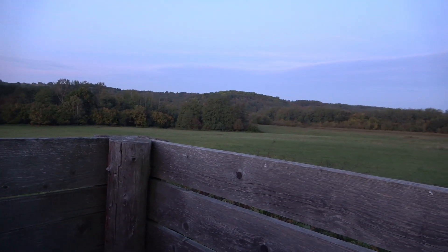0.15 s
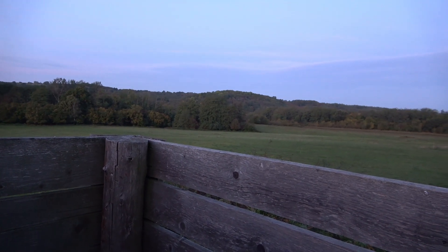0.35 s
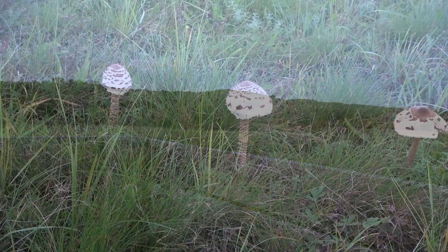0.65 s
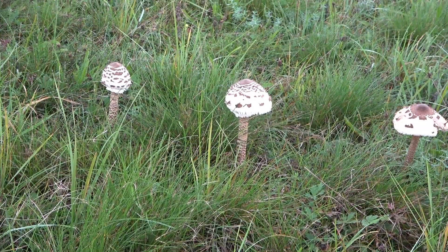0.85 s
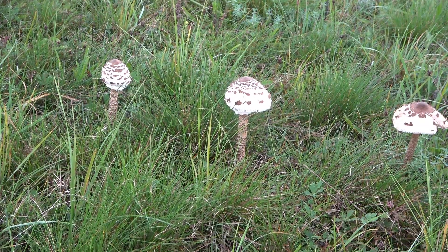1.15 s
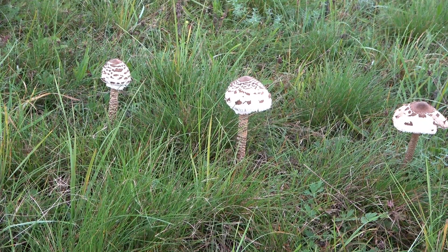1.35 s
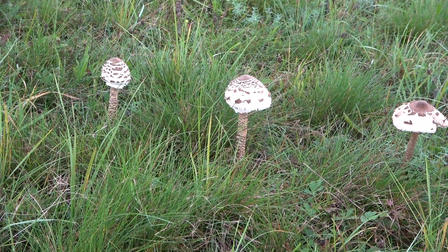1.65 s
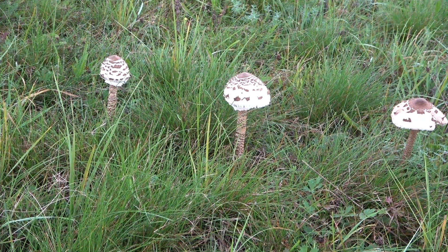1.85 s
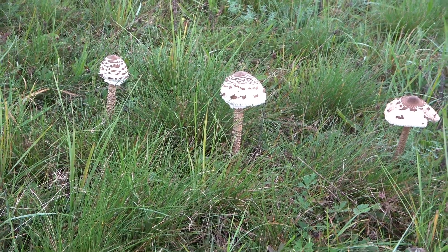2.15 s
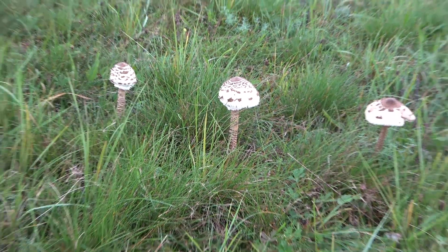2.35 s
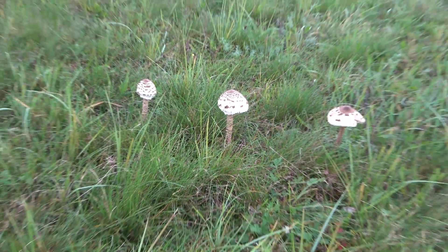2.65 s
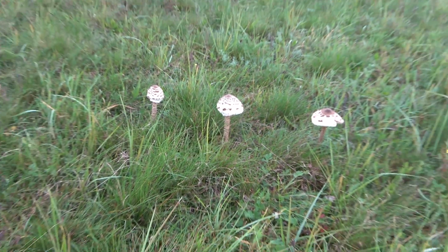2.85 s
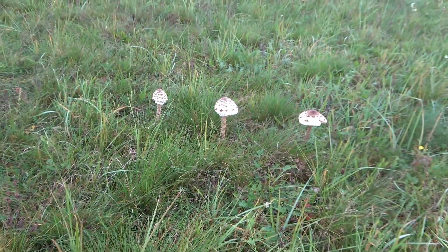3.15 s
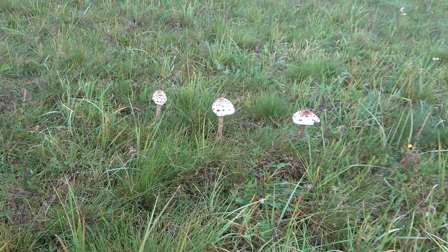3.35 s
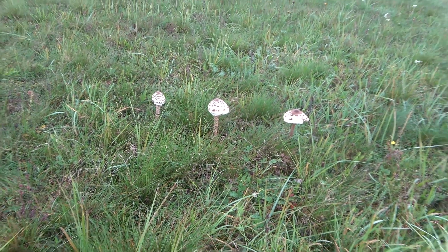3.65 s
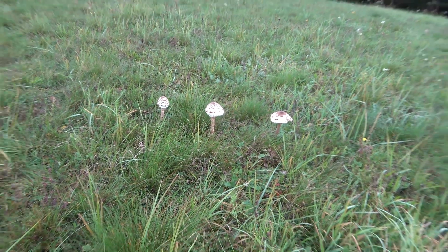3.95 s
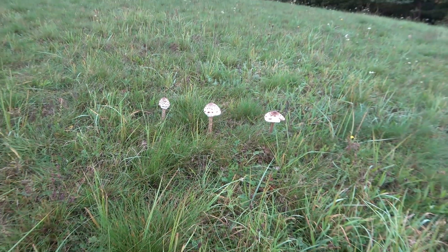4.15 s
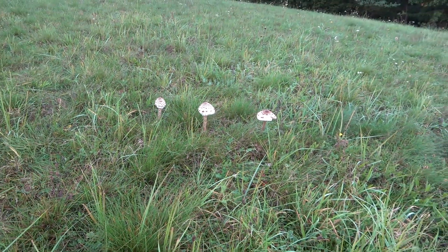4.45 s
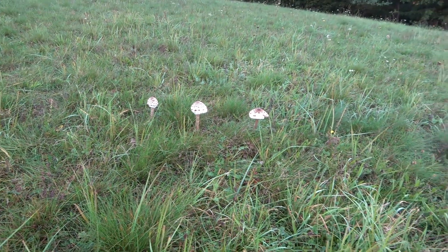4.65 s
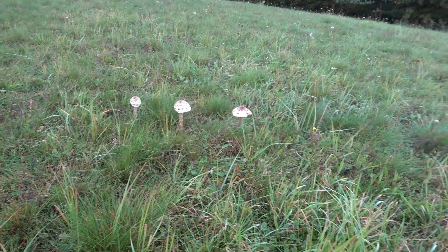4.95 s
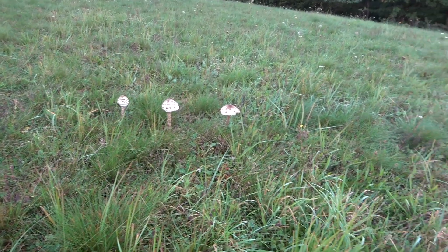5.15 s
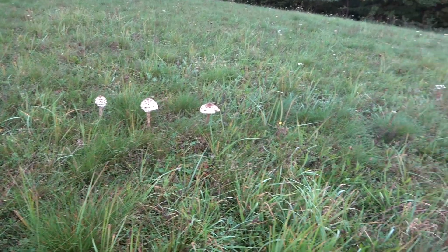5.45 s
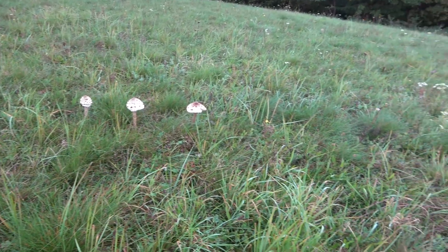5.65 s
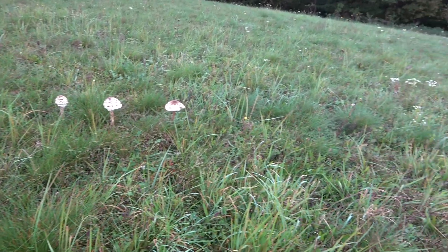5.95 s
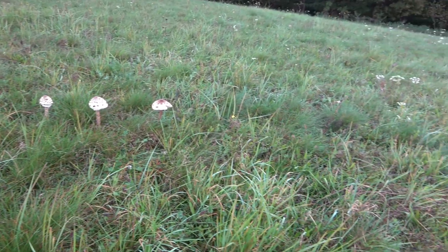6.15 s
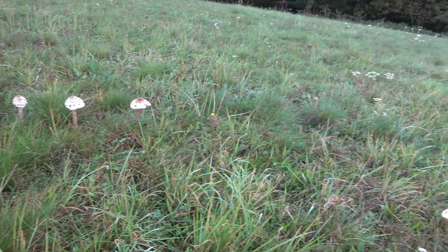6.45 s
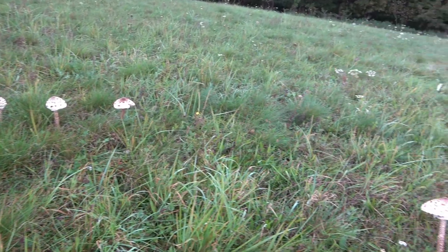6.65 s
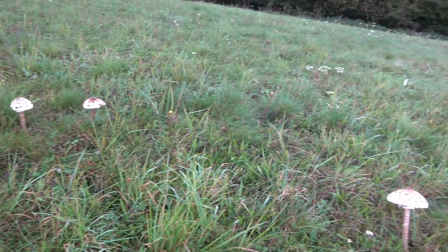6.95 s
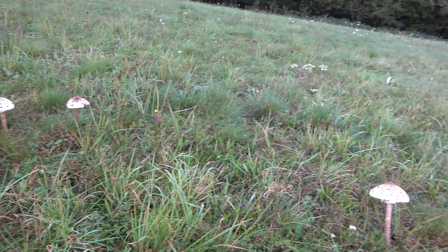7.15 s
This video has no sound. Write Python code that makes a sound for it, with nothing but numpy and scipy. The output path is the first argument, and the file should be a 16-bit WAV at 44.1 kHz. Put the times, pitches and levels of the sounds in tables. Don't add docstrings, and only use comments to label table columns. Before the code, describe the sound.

Across a quiet meadow, a buck belches out a run of croaking groans, uneven in length and strength, the third faint and the sixth brief. Early ones are cleaner knocks, later ones hoarser and thinner. Breathy rasp and scattered woodland echo trail each call. The field microphone hears the right side clearer and earlier, with the left duller, over insect fizz and soft rumble.

```python
import sys
import numpy as np
from scipy import signal
from scipy.fft import rfft, irfft, next_fast_len
from scipy.io import wavfile
from scipy.ndimage import uniform_filter1d

SR = 44100
rng = np.random.default_rng(int(sys.argv[2]) if len(sys.argv) > 2 else 0)


def volts_from_db(level):
    exponent = np.asarray(level, float) / 20
    return 10 ** exponent


def put_to_file(sound):
    columns = np.atleast_2d(sound).T
    safe = np.clip(columns, -1, 1)
    whole_steps = np.round(safe * 32767)
    wavfile.write(sys.argv[1], SR, whole_steps.astype(np.int16))


N = 321930
LEAD_SAMPLES = 40

# time_s, peak_db, lips_over_peak_db, palate_over_peak_db
ACCENTS = [(0.3604, -33.5, -9.5, -43), (0.6602, -19.5, -8, -34), (1.2317, -37.5, -5.5, -21),
           (1.2779, -26, -12, -37), (1.3254, -28.5, -0.5, -26.5), (1.3724, -29, -11.5, -17),
           (1.4076, -23.5, -10.5, -26), (1.5358, -24.5, -16, -24), (2.2255, -40, -11.5, -47),
           (2.3239, -29.5, -15.5, -28.5), (2.4509, -26.5, -10, -35), (2.4956, -27, -6, -34),
           (3.0824, -34, -12, -18), (3.1355, -32, -20, -29), (3.1799, -24, -10.5, -31),
           (3.3444, -21.5, -14, -32.5), (3.3813, -21.5, -18, -19), (4.3707, -46.5, -3, -17),
           (4.4219, -32.5, -2.5, -29), (4.5038, -22, -13, -31), (4.6453, -30, -3, -16),
           (4.686, -32, -4.5, -24), (4.7247, -28.5, -11.5, -38), (5.7389, -30.5, -11, -16),
           (5.7933, -17.5, -15.5, -26), (5.8282, -18.5, -15.5, -22), (6.4211, -20.5, -8.5, -35),
           (6.5132, -19, -18, -28), (6.999, -35, -11.5, -28), (7.228, -19.5, -12, -26.5)]
# start_s, crest_s, end_s, gullet_db, lower_throat_db
BODY = [(-.3, -0.234, 0.017, -43, -72), (0.374, 0.445, 0.75, -33, -46.5), (1.252, 1.397, 1.565, -33, -51.5),
        (2.242, 2.425, 2.52, -30.5, -47), (3.146, 3.218, 3.555, -31.5, -47), (4.186, 4.325, 4.39, -33, -60),
        (4.416, 4.58, 4.713, -32, -59), (5.085, 5.126, 5.356, -32.5, -54), (5.704, 5.733, 6.11, -35, -50),
        (6.32, 6.475, 6.68, -34, -47.5), (7.012, 7.06, 7.39, -31.5, -47.5)]
# open_s, widest_s, closed_s, mouth_db, throat_db
MOUTH = [
    (-.3, -.2, 0.017, -37.5, -49.5),
    (0.382, 0.578, 0.77, -27, -48.5),
    (1.216, 1.473, 1.607, -30.5, -50),
    (2.18, 2.4, 2.63, -38.5, -52.5),
    (3.076, 3.367, 3.55, -30, -48.5),
    (4.427, 4.564, 4.795, -33.5, -53),
    (5.095, 5.239, 5.35, -31.5, -53.5),
    (5.73, 5.817, 6.052, -32.5, -49.5),
    (6.36, 6.483, 6.681, -28.5, -47.5),
    (7.006, 7.219, 7.48, -29, -46.5),
]


def unit(x):
    return x / np.sqrt(np.mean(x ** 2) + 1e-20)


def unit_power(h):
    return h / np.sqrt(np.mean(np.abs(h) ** 2))


def along(points, hz):
    f, v = np.transpose(points)
    return np.interp(np.log(hz + 1), np.log(f + 1), v)


def filtered(x, response):
    m = next_fast_len(N + SR // 2)
    spectrum = rfft(x, m) * response(np.fft.rfftfreq(m, 1 / SR))
    return irfft(spectrum, m)[..., :N]


def swell(rows, level_db, build_db, sag_db, attack_db_s, release_db_s):
    t, power = np.arange(0, N + 64, 64) / SR, 1e-12
    for (start, crest, end), db in zip(np.asarray(rows)[:, :3], level_db):
        shape = np.interp(t, [start, crest, end], [-build_db, 0, -sag_db])
        shape -= attack_db_s * np.clip(start - t, 0, None)
        shape -= release_db_s * np.clip(t - end, 0, None)
        power = power + volts_from_db(db + shape) ** 2
    return np.interp(np.arange(N) / SR, t, 10 * np.log10(power))


def power_sum_db(a_db, b_db):
    return 10 * np.log10(volts_from_db(a_db) ** 2 + volts_from_db(b_db) ** 2)


def effort():
    # start_s, crest_s, end_s, level_db
    grunts = [(-.1, 0, 0.039, -40), (0.16, 0.252, 0.54, -49), (0.316, 0.425, 0.85, -36.5),
              (0.794, 0.854, 0.96, -42.5), (1.22, 1.423, 1.57, -35.5), (1.68, 1.71, 1.537, -23.5),
              (1.95, 2.054, 2.04, -46), (2.25, 2.45, 2.644, -33), (2.743, 2.86, 3, -42),
              (3.112, 3.294, 3.61, -35.5), (3.744, 3.793, 6.8, -50), (4.082, 4.17, 4.17, -32),
              (4.456, 4.542, 4.6, -33.5), (4.766, 4.82, 4.77, -30.5), (5.07, 5.267, 5.4, -35),
              (5.497, 5.564, 5.54, -34), (5.745, 5.914, 6.1, -28.5), (6.34, 6.5, 6.76, -33),
              (7.02, 7.13, 7.25, -31.5)]
    body, mouth, grunts = np.array(BODY), np.array(MOUTH), np.array(grunts)
    gullet = swell(body, body[:, 3], 5.8, 8.6, 141, 160)
    chest = swell(grunts, grunts[:, 3], 4.5, 7.9, 147, 98)
    lower = swell(body, body[:, 4], 4.7, 10.6, 240, 53)
    later_s = [0.041, 0.056, 0.052, 0, 0]
    upper = swell(mouth + later_s, mouth[:, 4], 3.9, 10.5, 240, 67)
    opening = swell(mouth, mouth[:, 3], 12.7, 13.4, 390, 116)
    upper = power_sum_db(upper, gullet - 26)
    opening = power_sum_db(opening, gullet - 19)
    return chest, power_sum_db(gullet, -61), lower, upper, opening


def folds(mouth_db):
    # time_s, snap_rate_hz
    snap_rates = [
        [(0.318, 18.5), (0.382, 29.2), (0.675, 31.8), (0.82, 18.4)],
        [(1.182, 19.6), (1.343, 22.3), (1.449, 33.7), (1.63, 18.7)],
        [(2.067, 19.9), (2.17, 18.0), (2.437, 24.8), (2.605, 16.0)],
        [(3.032, 20.5), (3.101, 17.8), (3.301, 34.2), (3.645, 15.4)],
        [(4.046, 17.8), (4.379, 18.9), (4.534, 30.0), (4.875, 18.0)],
        [(5.042, 26.1), (5.265, 27.3), (5.307, 36.4), (5.405, 21.4)],
        [(5.683, 37.5), (5.946, 28.2), (5.973, 20.3), (6.145, 24.2)],
        [(6.305, 20.2), (6.534, 38.2), (6.673, 20.3), (6.736, 22.1)],
        [(6.962, 22.1), (7.156, 36.9), (7.194, 30.0), (7.295, 32.8)],
    ]
    crest_db, follow = 9, 0.76
    train, voiced, age_s, which = np.zeros(N), np.zeros(N), np.zeros(N), np.zeros(N, int)
    for k, rows in enumerate(snap_rates):
        s, rate_hz = np.transpose(rows)
        at = np.arange(round(s[0] * SR), min(N, round(s[-1] * SR)))
        now_hz = np.interp(at / SR, s, rate_hz)
        snap = np.diff(np.floor(np.cumsum(now_hz) / SR), prepend=-1) > 0
        train[at[snap] - 70] = np.sqrt(SR / now_hz[snap])
        voiced[at[0]:at[-1] + SR // 30] = 1
        which[at[0] - SR // 10:] = k
        age_s[at[0]:] = np.arange(N - at[0]) / SR
    snaps = np.flatnonzero(train)
    accent_db, bright_db, sharp_db = np.zeros(N), np.zeros(N), np.zeros(N)
    usual = np.mean(ACCENTS, axis=0)
    for s, db, lips_db, palate_db in ACCENTS:
        old = snaps[np.argmin(abs(snaps - s * SR))]
        size, train[old] = train[old], 0
        at = round(s * SR) - LEAD_SAMPLES
        train[at] = size
        accent_db[at] = np.clip(db - mouth_db[at] - crest_db, -8, 10)
        bright_db[at - 9:at + SR // 40] = follow * (lips_db - usual[2])
        sharp_db[at - 9:at + SR // 40] = follow * (palate_db - usual[3])
    return train, uniform_filter1d(voiced, SR // 50), age_s, which, accent_db, bright_db, sharp_db


def excite(train, rasp, click, puff_s, scatter_db):
    t = np.arange(SR // 20) / SR
    puff = np.exp(-t / puff_s) * (1 - np.exp(-t / 0.00057))
    chance = np.clip(rng.standard_normal(N), -2.2, 1.2)
    accented = np.round(np.array(ACCENTS)[:, 0] * SR).astype(int) - LEAD_SAMPLES
    chance[accented] = 0
    train = train * volts_from_db(scatter_db * chance)
    puffs = signal.fftconvolve(train, puff / np.linalg.norm(puff))[:N] * rng.standard_normal(N)
    click, rasp = np.clip(click, 0, 1), np.clip(rasp, 0, 1)
    snaps = np.sqrt(click) * train + np.sqrt(1 - click) * puffs
    return np.sqrt(1 - rasp) * snaps + np.sqrt(rasp) * rng.standard_normal(N)


def tract(x, modes, lo_hz, hi_hz):
    def response(f):
        ring = 0
        for k, (c, w, db) in enumerate(modes):
            ring = ring + (-1) ** k * volts_from_db(db) * 1j * f * w / (c * c - f * f + 1j * f * w)
        edge = signal.butter(4, [lo_hz, hi_hz], "band", fs=SR, output="sos")
        return unit_power(ring * signal.sosfreqz(edge, f, fs=SR)[1])
    return filtered(x, response)


def buck():
    # centre_hz, width_hz, level_db
    chest_modes = [(136.4, 30.3, -3), (157.3, 25, -4)]
    belly_modes = [(97.6, 53, -22), (123.5, 10.7, -6.5)]
    gullet_modes = [(182, 62, -6.5), (222, 19.6, 2.5), (240.4, 10.5, -17)]
    throat_modes = [(308, 28, -4.5), (359.4, 13.6, 2.5), (522, 53, -4.5), (608.2, 6.6, 2.5),
                    (838, 37, -10.5), (1020, 15.9, 4.5), (1069, 78, -3), (1275, 35, -4), (1510, 510, -16.5)]
    tongue_modes = [(1725, 60, -1.2), (1835, 86, -2.3), (1928, 39, 0.91)]
    jaw_modes = [(2053, 50, 15.5), (2231, 43, 15), (2375, 135, 2)]
    lips_modes = [(2545, 168, -5), (2793, 83, 1.5), (3010, 154, -1.5), (3047, 486, -7.5)]
    palate_modes = [(3885, 41, 3), (4270, 150, -8), (4770, 184, 0), (5880, 340, -16), (7260, 700, -18.5)]
    # hoarseness_0_to_1, belly_db, tongue_db, lips_db, palate_db
    characters = [
        (0.48, -3.5, -1.5, -1, 3),
        (0.34, 1.5, -1.5, -0.5, 2),
        (0.22, -4, 0.5, 2, 7.5),
        (0.19, 0.5, -3.5, -0.5, 2),
        (0.4, 1, 0, -0.5, 8),
        (0.59, 1.5, 3, -0.5, 8.5),
        (0.78, -11.5, 3.5, -0.5, 3.5),
        (0.64, -6, 2.5, -0.5, 4),
        (0.59, -7.5, 2, 0.5, 3.5),
    ]
    chest_db, gullet_db, lower_db, throat_db, mouth_db = effort()
    train, voiced, age_s, which, accent_db, bright_db, sharp_db = folds(mouth_db)
    hoarse, belly_db, tongue_db, lips_db, palate_db = np.transpose(characters)[:, which]

    hoarse = hoarse * np.clip(age_s / 0.096, 0, 1) ** 2
    shut_s = np.arange(N) / SR - np.array(MOUTH)[1:, 2][which]
    hoarse = hoarse + 0.34 * np.clip(shut_s / 0.027, 0, 1)
    closing_db = 8 * np.clip(age_s, 0, .6)
    rasp = 1 - voiced * (1 - hoarse)

    early = np.roll(train * volts_from_db(0.4 * accent_db), -130)
    train = train * volts_from_db(accent_db)

    push = excite(early, rasp + 0.11, 0.74, 0.0098, scatter_db=-1.6)
    chest = tract(volts_from_db(chest_db - 3.0) * push, chest_modes, 116.7, 203.7)
    chest = chest + tract(volts_from_db(chest_db + belly_db - 5.0) * push, belly_modes, 64.3, 134.6)

    pump = volts_from_db(gullet_db) * excite(early, 0.48 * rasp + 0.5 * (1 - voiced), 0.93, 0.0052, scatter_db=1.14)
    tight_db = 4 * (np.clip(age_s / 0.24, 0, 1) - .5)
    gullet = tract(volts_from_db(-8 - tight_db) * pump, gullet_modes[:1], 94, 271)
    gullet = gullet - tract(volts_from_db(-2.0 + 0.36 * tight_db) * pump, gullet_modes[1:], 143, 297)

    air = excite(train, rasp + 0.52, 0.1, 0.018, scatter_db=4.0)
    throat = tract(volts_from_db(throat_db + 8.0) * air, throat_modes[4:], 644, 1580)
    air = excite(train, rasp + 0.34, 0.19, 0.008, scatter_db=4.5)
    throat = throat + tract(volts_from_db(lower_db + 4) * air, throat_modes[:4], 312, 630)

    air = excite(train, rasp, 0.39, 0.0066, scatter_db=4.0)
    level_db = mouth_db + tongue_db - 2 - 0.55 * bright_db + 22 * np.clip(shut_s, 0, .15)
    tongue = tract(volts_from_db(level_db) * air, tongue_modes, 1663, 2130)

    air = excite(train, rasp, 0.61, 0.013, scatter_db=2.5)
    jaw = tract(volts_from_db(mouth_db - 2.63 - 0.15 * closing_db) * air, jaw_modes, 1940, 2820)

    air = excite(train, rasp, 0.42, 0.0055, scatter_db=2.5)
    lips = tract(volts_from_db(mouth_db + lips_db - 3 - closing_db + bright_db) * air, lips_modes, 2230, 3650)

    air = excite(train, 0.55 * rasp, 0.05, 0.004, scatter_db=5.0)
    palate = tract(volts_from_db(mouth_db + palate_db - 22 - closing_db + sharp_db) * air, palate_modes, 2970, 7100)
    return chest + gullet + throat + tongue + jaw + lips + palate


def trees(x, count=40):
    # freq_hz, t60_s
    decay = [(100, 0.41), (1000, 0.27), (2500, 0.39), (6000, 0.38)]
    delay = 250
    out, hop = np.zeros((2, N + SR)), N // count + 1
    x, fade = np.pad(x, (hop, 2 * hop)), signal.windows.hann(2 * hop, sym=False)
    for start in range(0, N + hop, hop):
        hz, t, z = signal.stft(rng.standard_normal((2, SR // 2)), SR, nperseg=256)
        tail = signal.istft(z * volts_from_db(-60 * t / along(decay, hz)[:, None]), SR, nperseg=256)[1]
        tail = tail / np.linalg.norm(tail[0])
        wet = signal.fftconvolve((fade * x[start:start + 2 * hop])[None], tail, axes=1)
        out[:, start + delay:][:, :wet.shape[1]] += wet[:, :N + SR - start - delay]
    return out[:, hop:hop + N]


def echoes(voice):
    # freq_hz, level_db
    answer = [(100, -3.5), (220, -13), (500, -9), (1200, -12), (2000, -10.5), (5000, -7.5)]
    return filtered(trees(voice), lambda hz: volts_from_db(along(answer, hz)))


def rush(spectrum, patchy_db):
    z = signal.stft(rng.standard_normal((2, N)), nperseg=512)[2]
    field = uniform_filter1d(rng.standard_normal(z.shape[1:]), 6, 0)
    field = uniform_filter1d(field, 10, 1)
    pair = signal.istft(z * volts_from_db(patchy_db * unit(field)), nperseg=512)[1][:, :N]
    return unit(filtered(pair, lambda hz: volts_from_db(along(spectrum, hz))))


def insects():
    # freq_hz, density_db_per_hz
    fizz = [(7500, -15.5), (9000, -16), (10000, -8), (10900, -0.5), (12000, -10), (13000, -17),
            (13800, -33), (15700, -42)]
    t = np.arange(N) / SR
    lag_s, ramp_s = 0.14, 0.15
    busy = sum((t > row[0]) & (t < row[2] + lag_s) for row in BODY[1:]) + (t < .06) > 0
    thick = uniform_filter1d(busy * 1., round(ramp_s * SR))
    return volts_from_db(-63.5 + 4 * thick) * rush(fizz, patchy_db=0.9)


def meadow():
    # freq_hz, density_db_per_hz
    air = [(20, -16.5), (40, -18), (75, -20), (120, -3), (250, -20.5), (600, -18.5), (1000, -20.5),
           (1450, -25.5), (2100, -22.5), (3500, -33), (6000, -42.5), (8200, -57.5), (13500, -54.5),
           (15700, -58)]
    t = np.arange(N) / SR
    whistle_db = -76 + 3.5 * np.sin(2 * np.pi * 0.325 * t) - 0.66 * np.clip(t - 4.8, 0, 2)
    whistle = volts_from_db(whistle_db) * np.sin(2 * np.pi * 5400 * t)
    sway = volts_from_db(-53) * np.sin(2 * np.pi * 14 * t) * np.clip((2.55 - t) / .1, 0, 1)
    return volts_from_db(-49.0) * rush(air, patchy_db=2.0) + insects() + [whistle + sway, 0 * t]


def shadowed(near, twin):
    # freq_hz, level_db
    shadow = [(60, 1), (200, 1.5), (400, -2), (700, -8), (1035, -10.5), (1250, -6.5), (1700, -15),
              (2300, -6), (3300, -5.5), (4800, -4.5), (9500, 4), (11000, -7), (12000, -24), (13000, -5),
              (13700, -5), (15500, -2)]
    # freq_hz, likeness_0_to_1
    likeness = [(100, 1), (300, 0.97), (700, 0.88), (1500, 0.78), (2300, 0.73), (4800, 0.87), (6000, 0.44),
                (8000, 0.43), (10800, 1), (12000, 0.8), (14000, 0.8)]
    # freq_hz, phase_rad
    turn_rad = [(60, -0.4), (600, 1.194), (1100, -0.45), (2200, -0.026), (7000, -0.47), (10500, 0.79),
                (12000, -0.99)]
    lag_samples = 17.5

    def alike(hz):
        return np.clip(along(likeness, hz), 0, 1)

    def late(hz):
        phase = 2 * np.pi * hz * lag_samples / SR + along(turn_rad, hz)
        return volts_from_db(along(shadow, hz)) * np.exp(-1j * phase)

    shared = filtered(near, lambda hz: alike(hz) * late(hz))
    return shared + filtered(twin, lambda hz: np.sqrt(1 - alike(hz) ** 2) * late(hz))


def scene():
    voice = buck()
    echo = echoes(voice)
    near, twin = np.array([volts_from_db(-1.43) * voice + echo[0], volts_from_db(8.0) * echo[1]]) + meadow()
    return np.array([shadowed(near, twin), near])


def top_cut(x):
    return signal.sosfilt(signal.butter(12, 15720, fs=SR, output="sos"), x)


def record(dry):
    return top_cut(dry)


dry = scene()
out = record(dry)
put_to_file(out)
```